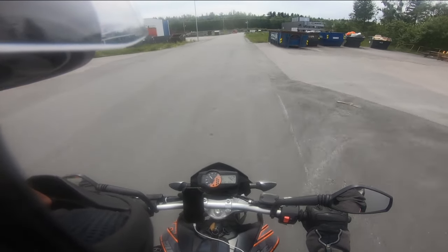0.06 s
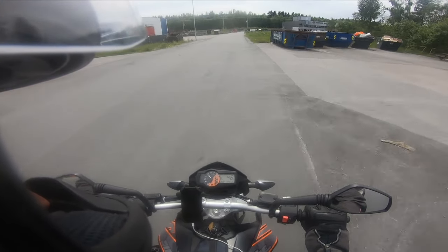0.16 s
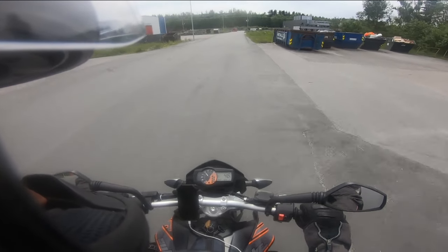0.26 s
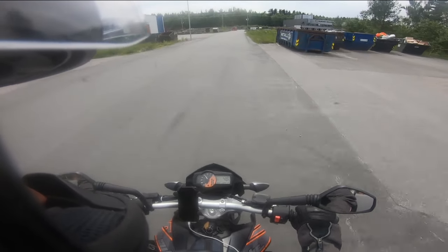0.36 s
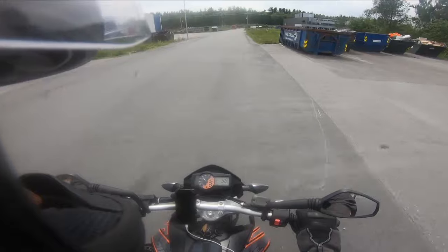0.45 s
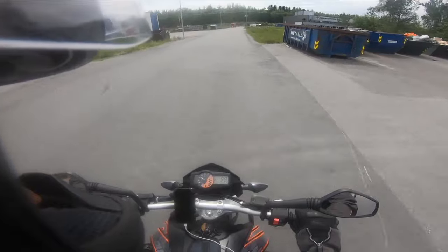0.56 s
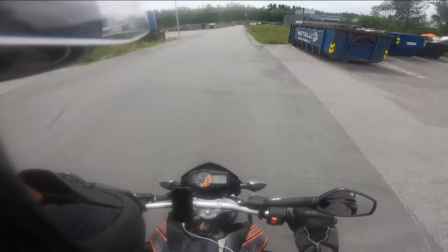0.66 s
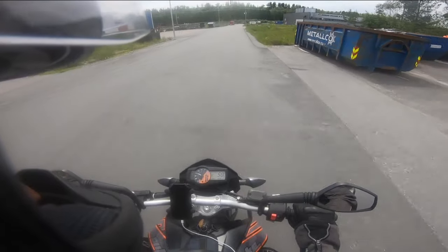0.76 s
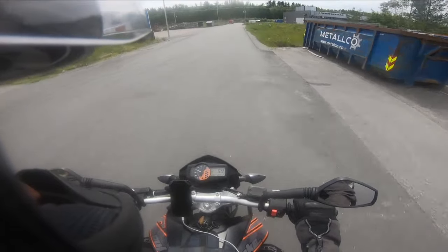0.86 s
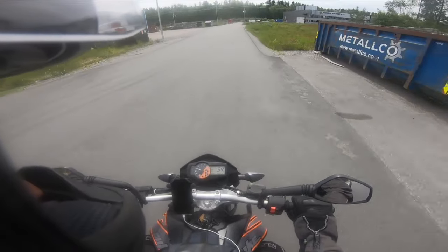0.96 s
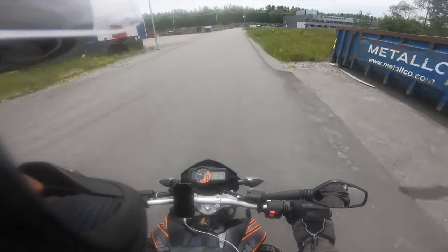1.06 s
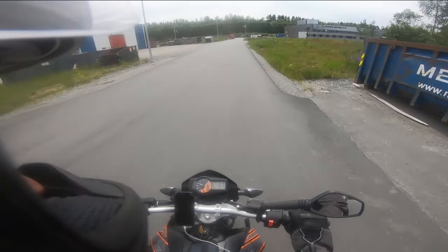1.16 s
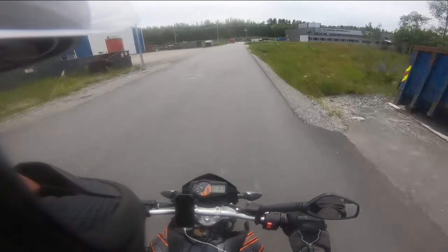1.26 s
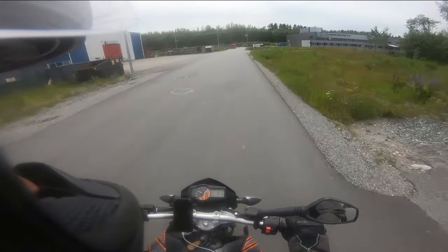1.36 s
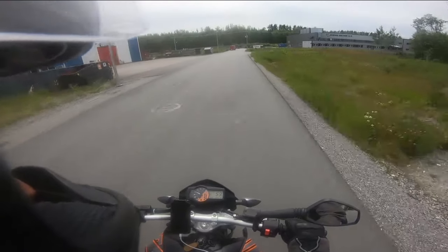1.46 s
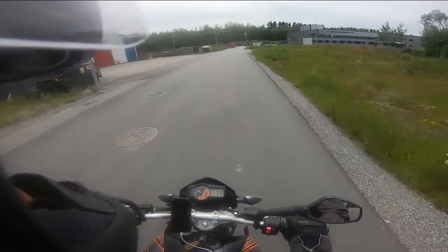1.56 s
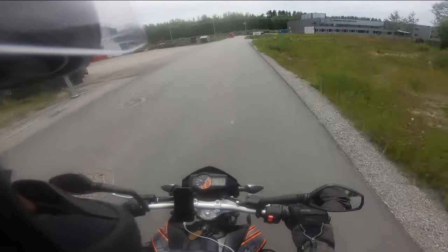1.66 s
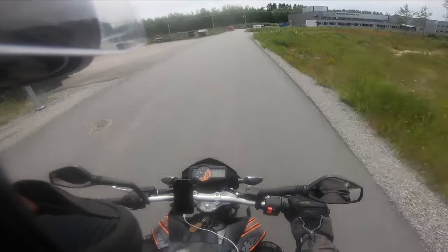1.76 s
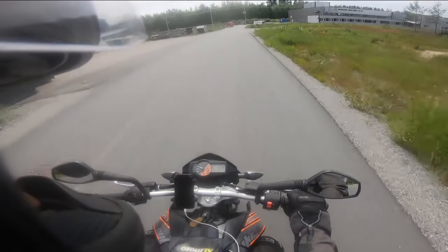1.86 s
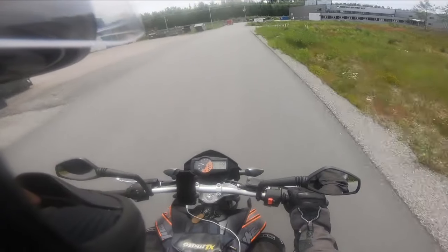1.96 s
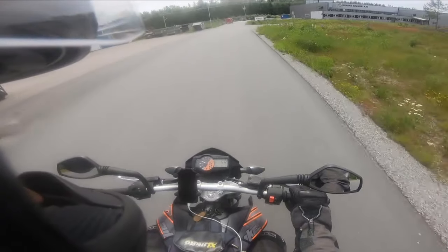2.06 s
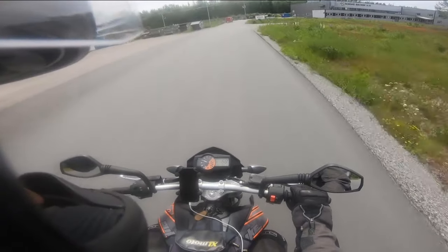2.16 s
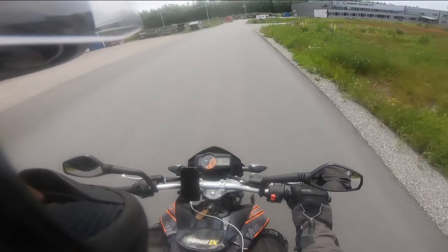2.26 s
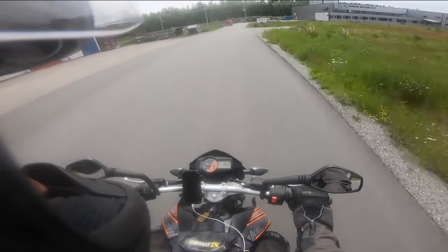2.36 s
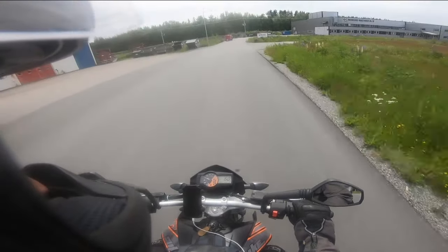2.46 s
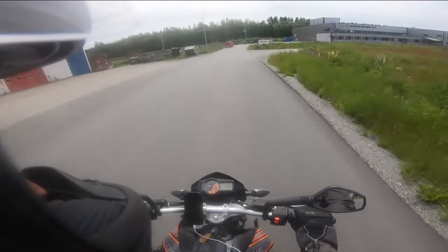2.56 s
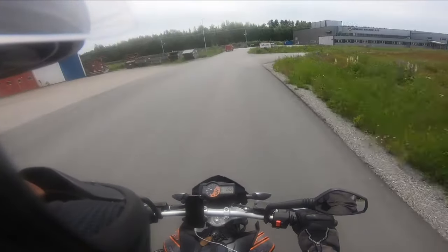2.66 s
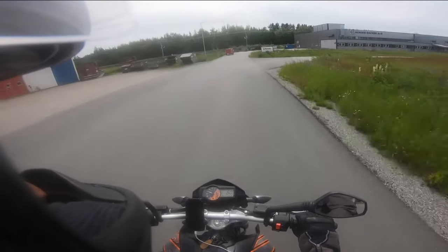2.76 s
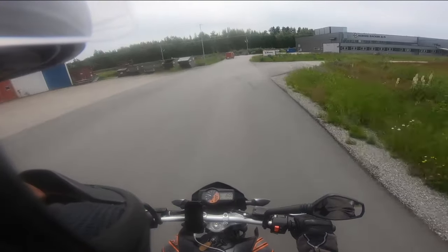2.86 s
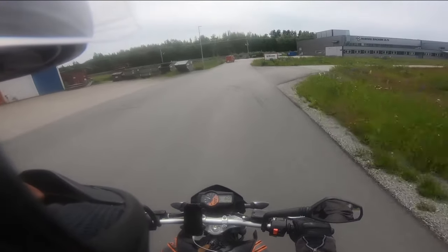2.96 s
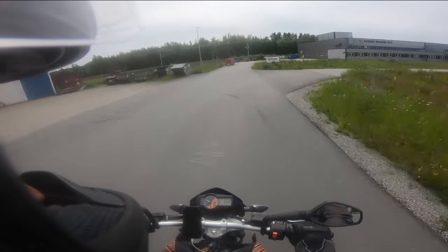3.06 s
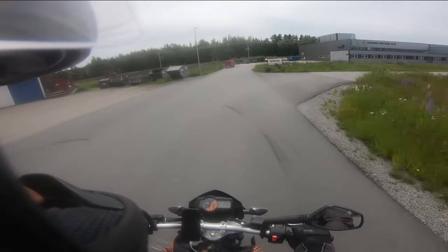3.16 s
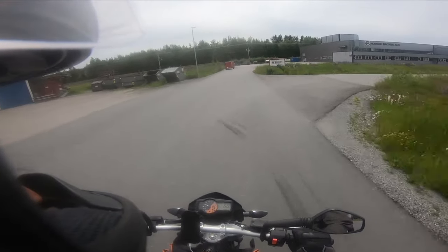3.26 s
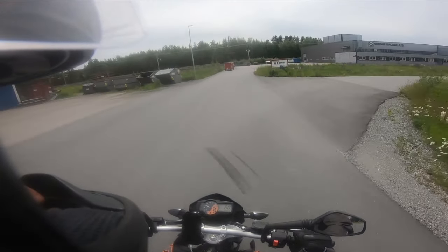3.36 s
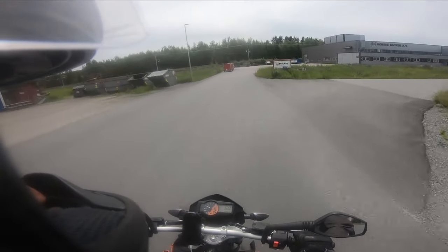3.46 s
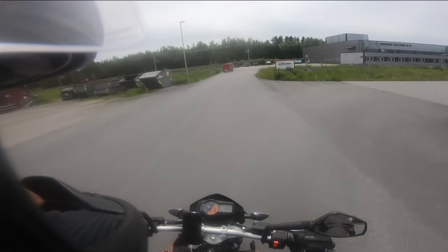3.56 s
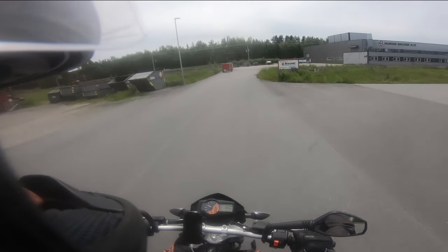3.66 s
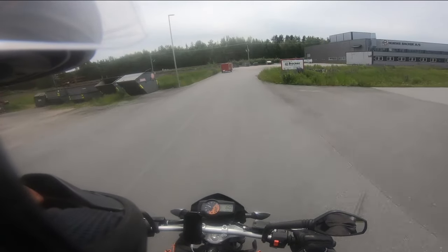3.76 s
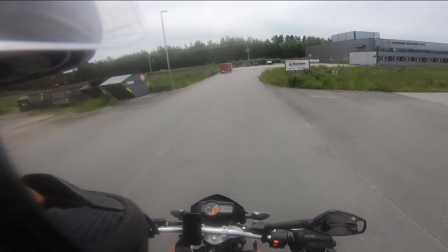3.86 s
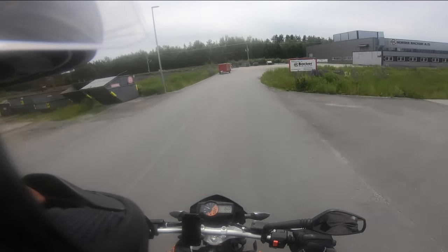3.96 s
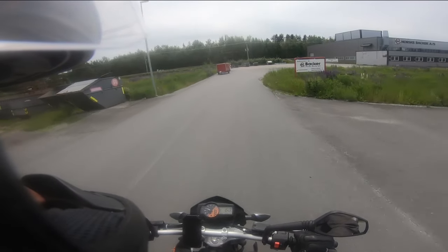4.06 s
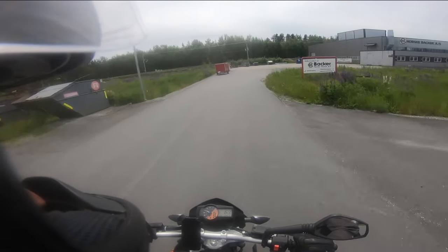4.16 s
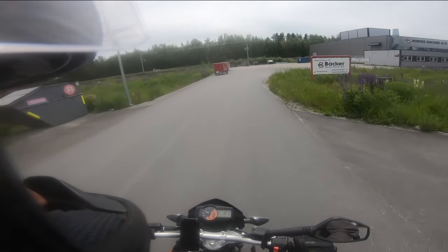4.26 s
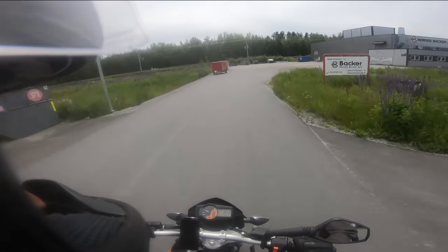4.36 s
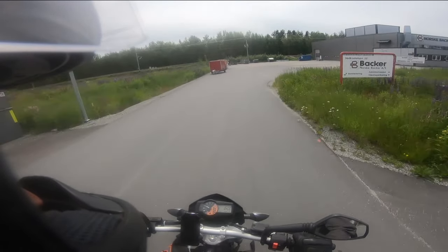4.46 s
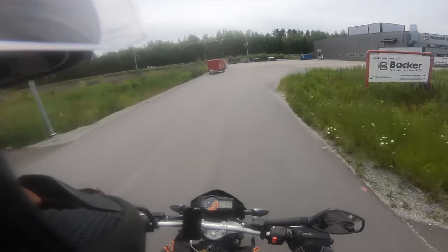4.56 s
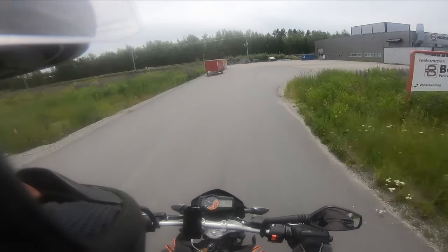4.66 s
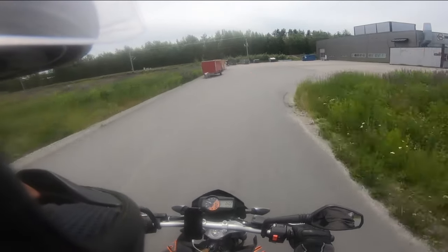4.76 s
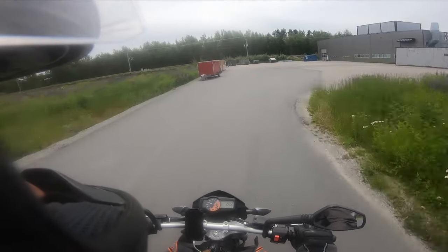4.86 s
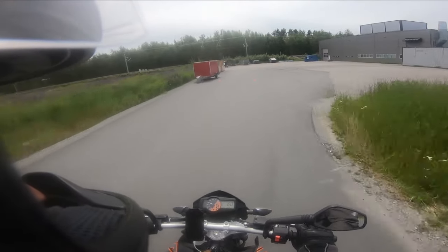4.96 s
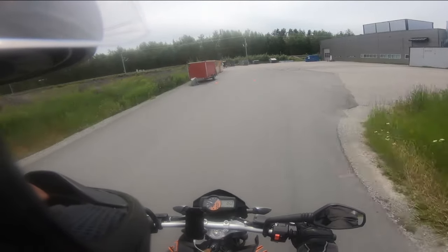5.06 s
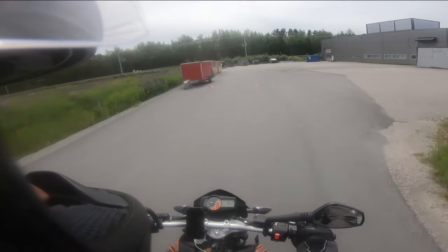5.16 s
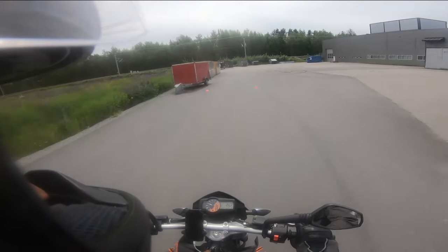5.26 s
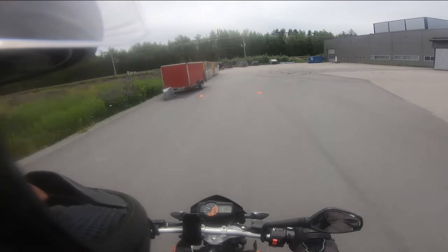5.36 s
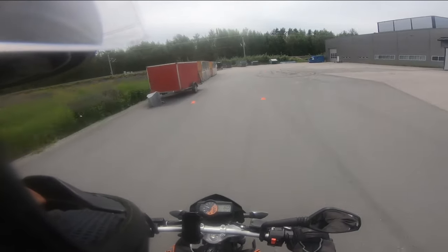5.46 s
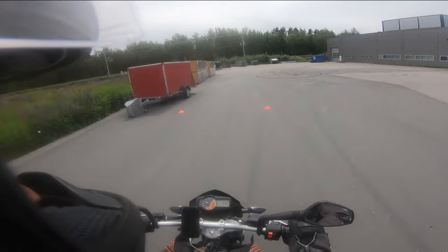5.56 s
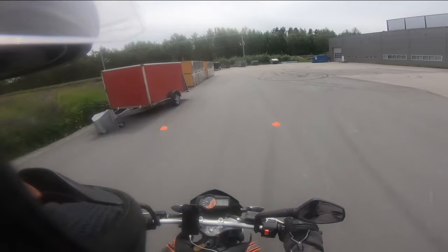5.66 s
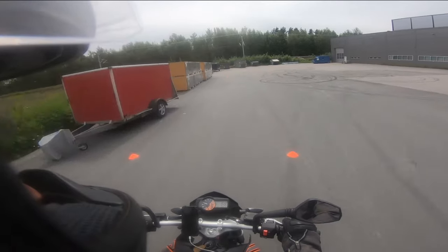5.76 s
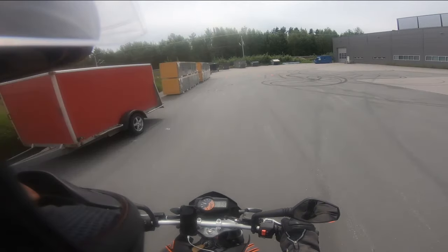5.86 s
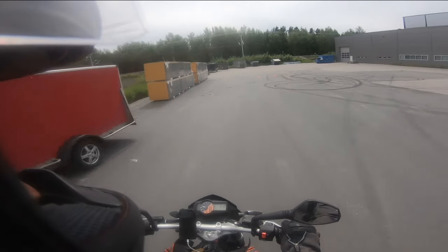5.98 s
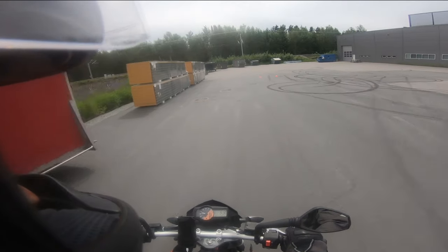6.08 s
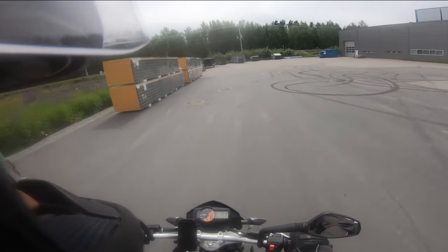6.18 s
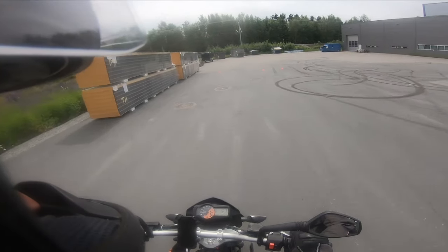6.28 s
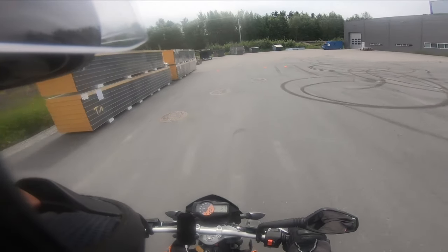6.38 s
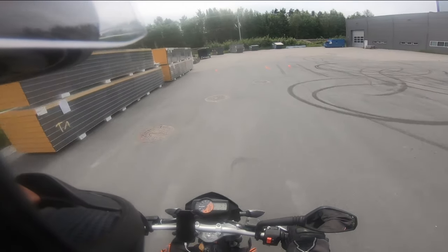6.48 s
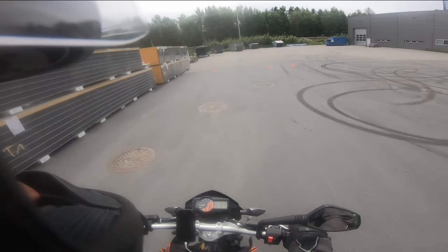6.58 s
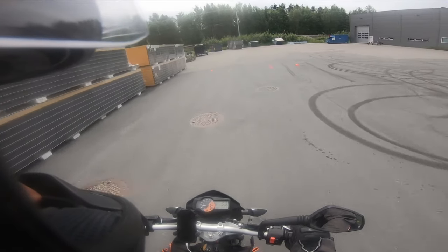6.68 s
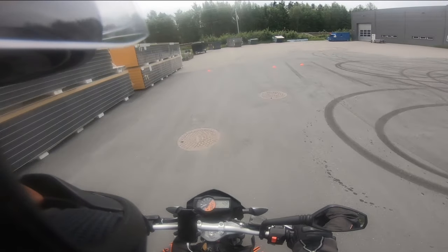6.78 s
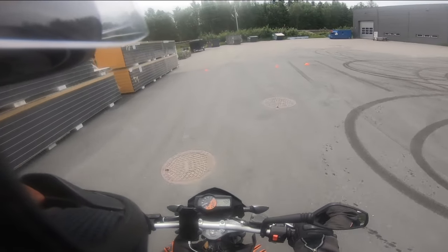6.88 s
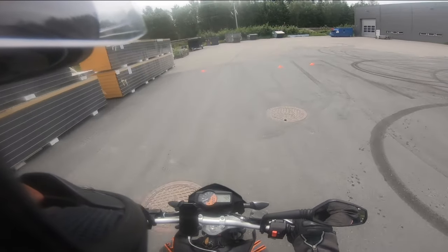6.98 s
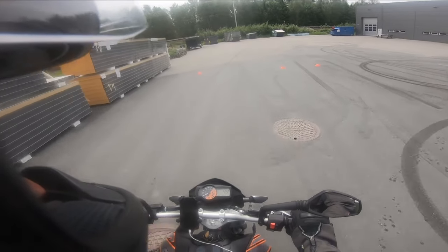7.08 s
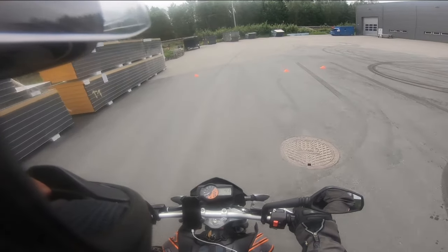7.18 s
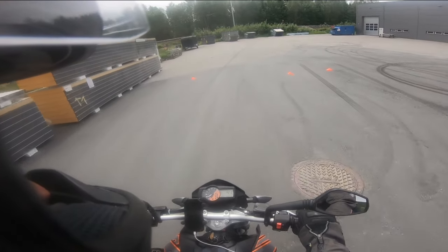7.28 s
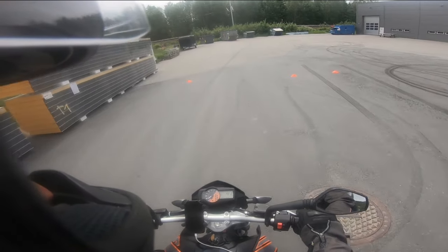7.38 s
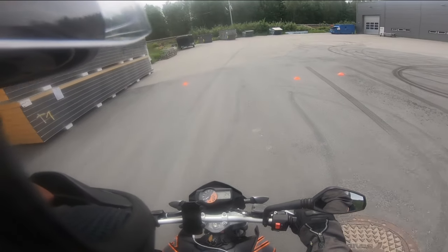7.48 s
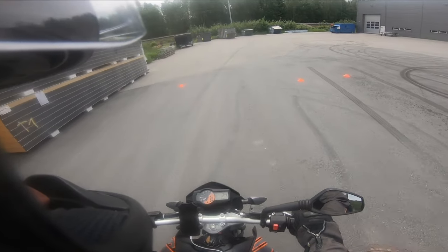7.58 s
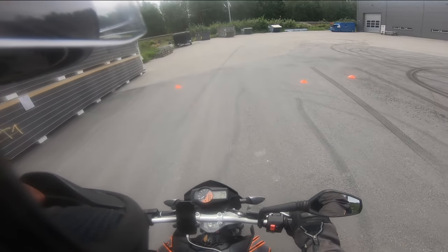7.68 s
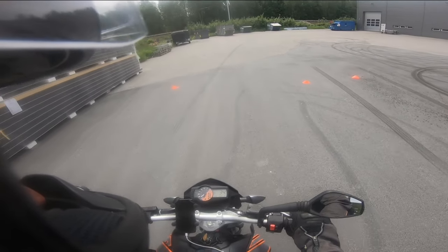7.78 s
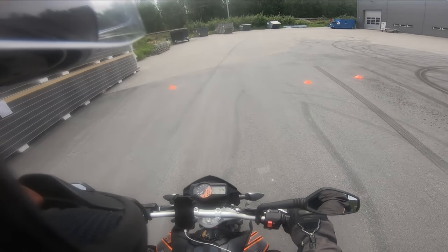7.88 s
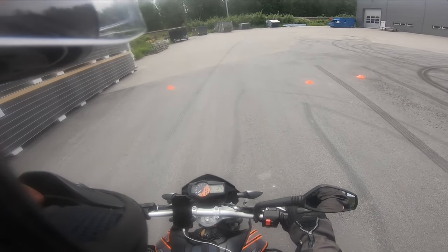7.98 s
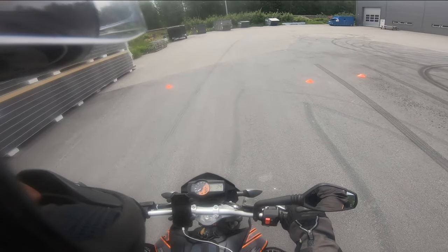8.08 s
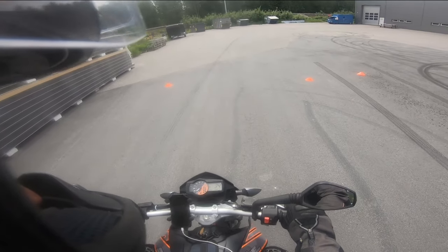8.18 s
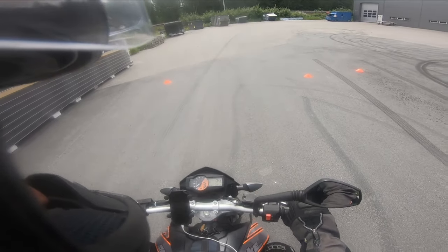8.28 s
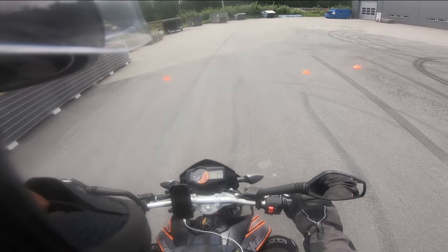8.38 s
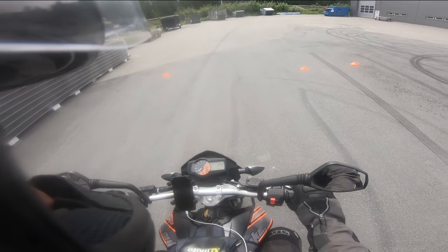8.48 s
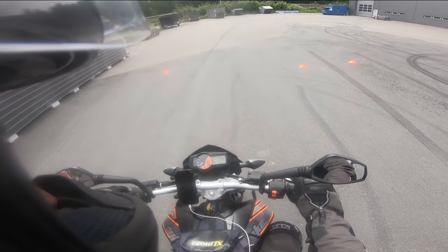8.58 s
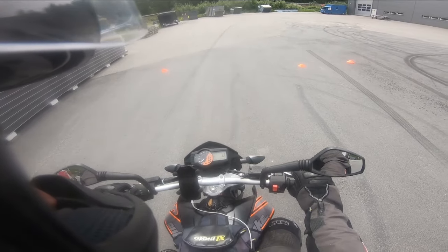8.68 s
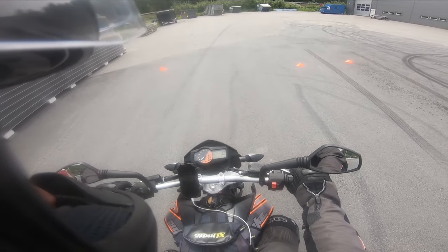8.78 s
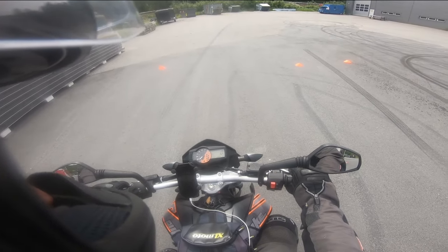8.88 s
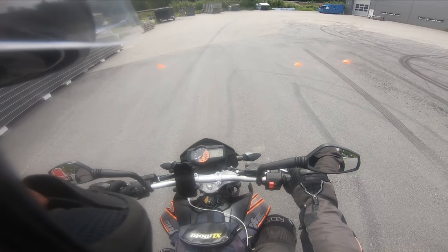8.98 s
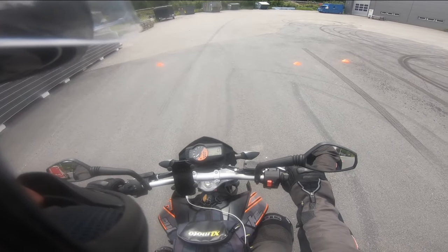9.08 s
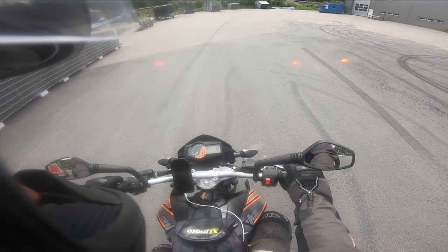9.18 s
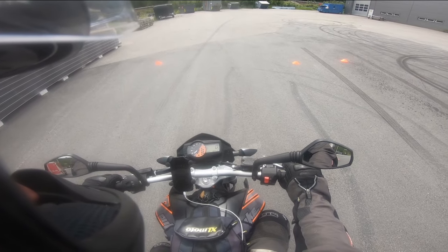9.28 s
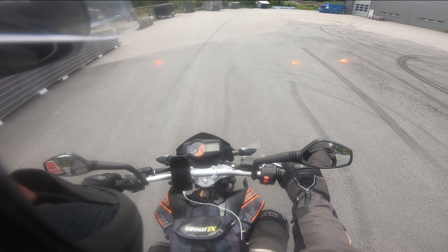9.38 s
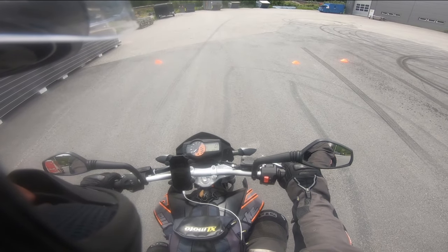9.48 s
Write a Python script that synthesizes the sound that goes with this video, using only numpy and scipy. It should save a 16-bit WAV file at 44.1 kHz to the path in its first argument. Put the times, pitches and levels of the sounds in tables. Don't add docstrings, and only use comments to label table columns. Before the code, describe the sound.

The microphone sits on the side of a rider's helmet in an open lot. From 0 to about 5.7 s, loud turbulent wind fills everything: deep buffeting, a broad low-mid roar and softer rush, with a rough hollow howl wandering roughly between 80 and 185 Hz, locking in by short spells. A brief change of gust comes near 1.8 s; brighter flutters pass around 4.2 to 5.8 s. From 6 s the wind sinks in uneven puffs, nearly gone by 8 s. At about 7.6 s a single-cylinder idle emerges, initially uneven and muffled, then steady at thirteen firings per second: low exhaust thump, hard woody-metallic knock, valve ticks and gear clatter, strongest after 8.2 s. A faint brake groan near 420 Hz sounds around 7.9 to 8.05 s. Small lever clicks scatter from 7.5 s, clustering sharply at 8.4 s. The idle continues to the end at 9.5 s.

```python
import sys
import numpy as np
from scipy import signal
from scipy.io import wavfile

SR = 44100
rng = np.random.default_rng(int(sys.argv[2]) if len(sys.argv) > 2 else 0)


def voltage_ratio(decibels):
    exponent = np.asarray(decibels, float) / 20
    return 10 ** exponent


def waveform_to_disk(signal):
    frames = np.transpose(np.atleast_2d(signal))
    scaled = np.clip(frames, -1, 1) * 32767
    samples = np.round(scaled).astype(np.int16)
    wavfile.write(sys.argv[1], SR, samples)


N = 420273

# start_s, airspeed_db (re cruising), exposure_db (of the microphone side)
AIR = [(0.0, 0, -3), (0.9, -0.5, -2.5), (1.3, -2, 0.5), (1.7, -5.5, 2), (1.85, 0.5, -3), (2.4, -1, -2),
       (2.75, 0, 0.5), (3.5, 1, 0), (4.4, -1.5, 1), (5.7, -2, 1.5), (5.95, -6, 2.5), (6.25, -7.5, 3.5),
       (6.45, -13.5, -0.5), (6.85, -22, 5.5), (7.0, -23, 7), (7.25, -32.5, 5), (7.8, -19, -13),
       (8.1, -45, -3), (9.53, -42.5, 3)]
WIND_BAND_HZ = [50, 370, 1300, 4200]
SPEED_SHARE = [0.249, 0.6, 0.9, 1.01]
EXPOSURE_SHARE = [0.17, 1.1, 1.24, 0.05]
# freq_hz, density_db (per Hz)
WIND_COLOUR = [(8.8, -46), (15, -31.5), (38, -5.5), (105, -3.5), (160, -5.5), (202, -6), (311, -6.5),
               (381, -10.5), (573, -11), (1200, -18.5), (1760, -24.5), (3000, -39.5), (3980, -38),
               (5500, -48.5), (6620, -49.5), (8610, -93.5), (14600, -120)]
# middle_s, length_s, strength_db, centre_hz
EDDIES = [(0.28, 0.11, 6.5, 76), (.5, .12, -2, 2500), (1.88, 0.16, -4, 43.3), (2.4, 0.082, 3, 43.6),
          (2.55, .3, 2.5, 50), (3.2, 0.09, 1, 2100), (3.7, 0.2, 0.5, 2200), (2.15, .12, -2, 2500),
          (4.24, 0.08, 3, 1800), (4.345, 0.075, -7, 1400), (4.727, 0.27, 2.5, 2370),
          (4.991, 0.12, 5.5, 2600), (4.948, 0.14, -2, 51), (5.377, 0.19, 2.5, 2300),
          (5.807, 0.12, 5.5, 2420), (6.163, 0.21, -4, 40), (6.349, 0.021, -9, 504), (6.523, 0.44, 3, 50),
          (6.701, 0.12, -7.5, 320), (6.933, .2, 3.5, 683), (7.267, .08, -8.5, 330), (7.4, 0.15, 4, 140),
          (7.713, 0.21, 11, 324), (7.871, 0.04, 14, 160), (1.4, 0.28, 1, 390), (4.87, 0.069, -4.5, 1800),
          (8.8, 0.5, 10.5, 450), (8.3, .5, -4, 200), (6.0, .2, -3, 1600), (8.3, 0.34, -6, 70),
          (4.8, .25, -5, 120), (8.45, .35, 8, 360), (4.75, 0.18, -2, 210), (6.1, 0.97, -8, 29),
          (5.9, .4, 3, 28), (1.2, 2.7, 2, 16000), (6.45, .2, 5.5, 151), (5.2, .15, -1, 3500),
          (6.448, 0.026, 3, 850), (7.345, 0.038, 2, 900), (7.4, .1, -3.5, 2500), (5.72, 0.31, -3.5, 620),
          (3.25, 0.2, 1, 170), (7.4, 0.4, 3, 100), (8.4, 0.27, -2, 190), (2.87, .14, 4, 1700),
          (2.85, .1, -3, 260), (5.55, .3, -2.5, 140), (4.55, .1, -3, 300), (4.05, .12, -2, 1800)]
# time_s, pitch_hz
SHEDDING = [(0.0, 123.7), (0.13, 111.8), (0.22, 139.6), (0.33, 176), (0.39, 180), (0.5, 131.7), (0.56, 117),
            (0.68, 135.5), (0.75, 110.2), (0.84, 123.6), (1.0, 106.2), (1.15, 113.2), (1.37, 125.8),
            (1.58, 113.3), (1.68, 122), (1.76, 151), (1.82, 152), (1.87, 180), (1.92, 178), (2.03, 146),
            (2.1, 116), (2.17, 131), (2.24, 132), (2.29, 146), (2.36, 122.2), (2.47, 106.4), (2.8, 92),
            (3.0, 125), (3.22, 148), (3.55, 134.7), (3.8, 128), (3.95, 175), (4.05, 185), (4.2, 110),
            (4.45, 92), (4.7, 78), (4.86, 97), (5.2, 112), (5.6, 96.8), (7.2, 64.6)]
# middle_s, length_s, lift_db
LOCKS = [(0.02, 0.25, 16), (0.368, 0.12, 8), (.45, .1, 8), (.85, .08, 10), (1.86, .1, 9), (2.26, .1, 13.5),
         (0, .03, 20), (2.57, .1, 9), (4.1, .1, 5), (4.86, .12, 13), (0.61, 0.34, 15), (0.775, 0.17, 16),
         (1.14, 0.095, 12.5), (1.351, 0.11, 10.5), (1.68, .1, 9.5), (1.78, 0.12, 11), (1.92, .12, 6.5),
         (2.15, 0.3, 15.5), (2.37, 0.18, 14.5), (2.803, .2, 10.5), (3.1, .2, 7), (3.24, 0.083, 8.5),
         (3.55, 0.13, 11), (3.72, 0.17, 12), (4.22, 0.28, 13), (4.45, 0.13, 9), (4.76, 0.25, 11),
         (5.247, 0.3, 10.5), (5.549, 0.23, 10.5), (6.16, 0.086, 4), (6.39, .1, 8), (6.664, 0.21, 15)]
# time_s, pitch_hz, level_db
BRAKE_GROAN = [
    (7.86, 420, -60),
    (7.91, 421, -45),
    (8.02, 417, -42),
    (8.08, 413, -72),
]
# start_s, peak_db
LEVER_CLICKS = [(7.479, -50), (7.5017, -42), (7.5045, -42), (7.514, -46), (7.5945, -42), (7.599, -41),
                (7.637, -46), (7.65, -46), (7.719, -45), (7.914, -37), (8.104, -44), (8.2436, -35),
                (8.248, -36), (8.293, -41), (8.336, -38), (8.352, -38), (8.379, -31), (8.3815, -30),
                (8.385, -33), (8.389, -24), (8.394, -36), (8.398, -23), (8.4074, -37), (8.412, -36),
                (8.417, -34), (8.452, -36), (8.484, -44), (8.624, -43), (8.68, -41), (8.9315, -41),
                (8.98, -42), (9.139, -43), (9.2098, -39), (9.232, -41), (9.343, -42)]
# freq_hz, level_db, t60_s
LEVER_MODES = [(2630, 1, 0.0091), (3050, 1.5, 0.0078), (3480, -1, 0.012), (4100, -7, 0.0055),
               (4900, -12, .005), (5800, -16, 0.0041), (6800, -8, .004), (8500, -9, .003)]
# start_s, peak_db
GRIT = [
    (6.5913, -50),
    (6.776, -50),
    (7.0162, -56),
    (7.2348, -53),
    (7.2676, -57),
    (7.4048, -57),
]
# freq_hz, level_db, t60_s
TAPPET_MODES = [(3600, 1.5, .006), (4500, -1, .004), (5700, -4, .005), (6800, -6, .004), (8200, -0.5, .003)]
# time_s, peak_db
TAPPET_PEAK = [
    (7.57, -59),
    (8.1, -56),
    (8.35, -48),
    (8.9, -52),
    (9.5, -48),
]
# time_s, level_db
CLATTER_LEVEL = [(7.3, -58), (7.41, -63), (7.7, -54), (7.85, -52.5), (8.11, -46.5), (8.29, -41.5),
                 (8.7, -46), (8.91, -47), (9.53, -44.5)]
# freq_hz, width_hz, level_db
CASING = [(276, 89, 6), (627.2, 53, 13.5), (454, 96, 8.5), (810, 150, 9), (1170, 290, 5), (1660, 240, 2),
          (2850, 500, -34), (3400, 270, -4.5), (4250, 460, -10), (4750, 400, -11), (5750, 400, -12.5),
          (6640, 500, -21), (8500, 830, -10)]
# start_s, knock_peak_db, thump_peak_db
FIRINGS = [(7.571, -18, -15), (7.646, -31, -26), (7.721, -25, -19.5), (7.796, -37, -25), (7.873, -35, -25),
           (7.949, -31, -17.5), (8.024, -32, -19), (8.103, -24, -18), (8.179, -16.5, -18.5),
           (8.254, -12, -14.5), (8.328, -17, -11.5), (8.403, -21, -10), (8.48, -19, -8.5),
           (8.558, -20, -9.5), (8.635, -18, -9.5), (8.715, -22, -10), (8.787, -20, -11.5),
           (8.864, -19, -18.5), (8.94, -17.5, -15.5), (9.018, -22, -14.5), (9.094, -17, -14),
           (9.167, -18, -16.5), (9.241, -17.5, -20), (9.319, -15.5, -11.5), (9.398, -21, -16),
           (9.476, -19, -11)]
# freq_hz, level_db, t60_s
PIPE_MODES = [(112.6, 3.4, .128), (51.8, .3, .3), (71.9, 1.0, .1)]
# freq_hz, level_db, t60_s
SILENCER_MODES = [(266, -22, 0.04), (316, -23, 0.04), (380, -21, 0.03), (470, -25, .03)]
# freq_hz, level_db, t60_s
HEAD_MODES = [(651, 6.5, 0.013), (672, 1, 0.017), (1063, -10.5, 0.035), (780, -5, 0.026),
              (490, -16.5, 0.021)]
# freq_hz, level_db, t60_s
VALVE_MODES = [(1560, 7, 0.014), (1634, 6.5, 0.024), (1810, 1, 0.018), (1180, -2, .02), (2230, -7, 0.013),
               (3360, -7, .015), (3680, -15, .015)]
# time_s, peak_db
VALVE_PEAK = [
    (7.57, -47),
    (8.1, -33),
    (8.45, -36.5),
    (8.9, -39),
    (9.3, -34.5),
]
# time_s, level_db
STRAY_STEPS = [
    (6.437, -60),
    (6.8, -62),
    (7.157, -57),
    (7.352, -57),
]


def rms_one(x):
    return x / np.sqrt(np.mean(x ** 2) + 1e-20)


def in_time(rows):
    s, *columns = np.transpose(rows)
    return [np.interp(np.arange(N) / SR, s, c) for c in columns]


def bump(middle_s, length_s):
    return np.exp(-4 * ((np.arange(0, N, 50) / SR - middle_s) / length_s) ** 2)


def per_sample(coarse):
    return np.interp(np.arange(N), np.arange(0, N, 50), coarse)


def drift(rate_hz):
    r = np.exp(-40 * np.pi * rate_hz / SR)
    white = rng.standard_normal(N // 20 + 3002)
    slow = signal.lfilter([1], [1, -2 * r, r * r], white)[3000:]
    return np.interp(np.arange(N) / 20, np.arange(len(slow)), rms_one(slow))


def butter(x, hz, kind, order=2):
    return signal.sosfilt(signal.butter(order, hz, kind, fs=SR, output="sos"), x)


def resonate(x, hz, width_hz):
    r = np.exp(-np.pi * width_hz / SR)
    zeros = np.array([1, 0, -1]) * (1 - r * r) / 2
    return signal.lfilter(zeros, [1, -2 * r * np.cos(2 * np.pi * hz / SR), r * r], x)


def clicks_at(seconds, sizes):
    train = np.full(N, 1e-18)
    at = np.round(np.asarray(seconds) * SR).astype(int)
    train[at[at < N]] = sizes[at < N]
    return train


def strike(seconds, peak_db, modes, spread_db):
    out = 0
    chance = rng.standard_normal((len(seconds), len(modes)))
    for k, (hz, level_db, t60_s) in enumerate(modes):
        r, w = voltage_ratio(-60 / (t60_s * SR)), 2 * np.pi * hz / SR
        sizes = (-1) ** k * voltage_ratio(peak_db + level_db + spread_db * chance[:, k])
        train = clicks_at(seconds, sizes)
        out = out + signal.lfilter([0, np.sin(w)], [1, -2 * r * np.cos(w), r * r], train)
    return out


def wind(gust_db, eddy_db, own_db):
    level_db, eddy_octaves = -13, 1.38
    speed_db, exposure_db = in_time(AIR)
    swells = np.array([db * bump(s, length_s) for s, length_s, db, hz in EDDIES])
    eddy_hz = np.array(EDDIES)[:, 3]
    colour_hz, colour_db = np.transpose(WIND_COLOUR)
    white = rng.standard_normal((2, N + SR))
    edges_hz = 15 * 2 ** (np.arange(29) / 3)
    shared = gust_db * drift(6.0) + eddy_db * drift(89.0)
    out, power = 0, 0
    for k, (low, high) in enumerate(zip(edges_hz, edges_hz[1:])):
        hz = np.sqrt(low * high)
        follows = np.interp(np.log(hz), np.log(WIND_BAND_HZ), SPEED_SHARE)
        exposed = np.interp(np.log(hz), np.log(WIND_BAND_HZ), EXPOSURE_SHARE)
        near = np.exp(-(np.log2(hz / eddy_hz) / eddy_octaves) ** 2)
        change_db = follows * speed_db + exposed * exposure_db + per_sample(near @ swells)
        density = voltage_ratio(np.interp(np.log(hz), np.log(colour_hz), colour_db))
        band = density * butter(white[k % 2], [low, high], "band")[SR:]
        if 2000 < hz < 3000:
            band = np.sqrt(2) * butter(band, hz, "low", order=4)
        power += np.mean(band ** 2)
        reach = np.clip(np.log2(hz / 97.0) / 10.0, 0, 1)
        out = out + band * voltage_ratio(change_db + reach * shared + own_db * drift(16.0))
    return voltage_ratio(level_db) * out / np.sqrt(power)


def howl(wobble_hz, flutter_db):
    tone_db, skirt_db, skirt_hz = -26, -23.5, 22.1
    start_rad = -1.9
    hz, = in_time(SHEDDING)
    speed_db = 0.3 * in_time(AIR)[0]
    locked_db = np.max([db * bump(s, length_s) for s, length_s, db in LOCKS], axis=0)
    level_db = tone_db + speed_db + per_sample(locked_db)
    t = np.arange(N) / SR
    fade = np.interp(t, [7.2, 7.6], [1, 0])
    loose = np.interp(t, [2.5, 4.5], [.7, 2.5])
    turn = 2 * np.pi * np.cumsum(hz + loose * wobble_hz * drift(15.84)) / SR
    rough = rms_one(voltage_ratio(flutter_db * drift(11.0)) * np.sin(start_rad + turn))
    tone = voltage_ratio(level_db - 3.0) / np.sqrt(loose) * rough
    skirt = drift(skirt_hz) * np.sin(turn) + drift(skirt_hz) * np.cos(turn)
    return fade * (tone + voltage_ratio(skirt_db + speed_db) * skirt)


def brake():
    hz, level_db = in_time(BRAKE_GROAN)
    t = np.arange(N) / SR
    on = (t > BRAKE_GROAN[0][0]) & (t < BRAKE_GROAN[-1][0])
    strength = voltage_ratio(level_db + 0.9 + 1.5 * drift(18.0))
    return on * strength * np.sin(2 * np.pi * np.cumsum(hz + 4.0 * drift(15.0)) / SR)


def lever():
    s, peak_db = np.transpose(LEVER_CLICKS)
    r = voltage_ratio(-60 / (0.047 * SR))
    train = clicks_at(s - .003, voltage_ratio(peak_db - 26.0))
    swell = signal.lfilter([np.e * (1 - r)], [1, -2 * r, r * r], train)
    white = rng.standard_normal(N)
    scratch = rms_one(resonate(white, 3000.0, 800.0) + 0.07 * butter(white, [4000.0, 9000.0], "band"))
    return strike(s, peak_db - 6.5, LEVER_MODES, spread_db=2.0) + swell * scratch


def tappets():
    lead_s = .011
    s = np.array(FIRINGS)[:, 0] - lead_s
    peak_db = np.interp(s, *np.transpose(TAPPET_PEAK))
    grit_s, grit_db = np.transpose(GRIT)
    ticks = strike(s, peak_db, TAPPET_MODES, spread_db=2.0)
    return ticks + strike(grit_s, grit_db, TAPPET_MODES, spread_db=5.0)


def clatter(ticks_per_s, grain, beat_db):
    hush_lead_s, hush_s, hush_db = .008, .016, 4
    level_db, = in_time(CLATTER_LEVEL)
    s = np.array(FIRINGS)[:, 0]
    beat = signal.lfilter([1], [1, -voltage_ratio(-60 / (.09 * SR))], clicks_at(s - .004, np.ones(len(s))))
    hush = per_sample(sum(bump(at - hush_lead_s, hush_s) for at in s))
    sizes = voltage_ratio(grain * np.minimum(rng.exponential(1, (3, N)), 3)) * rng.choice([-1, 1], (3, N))
    ticks = sizes * (rng.random((3, N)) < ticks_per_s / SR)
    body = 0
    for k, (hz, width_hz, db) in enumerate(CASING):
        body = body + voltage_ratio(db) * rms_one(resonate(ticks[k % 3], hz, width_hz))
    t = np.arange(N) / SR
    fade = np.interp(t, [6.6, 7.5], [0, 1])
    shaded = butter(body, 5500.0, "low", order=4)
    opened = np.interp(t, [7.8, 8.5], [0.6, 0.85])
    strength = voltage_ratio(level_db - 11.5 + beat_db * beat - hush_db * hush)
    return fade * strength * (shaded + opened * (body - shaded))


def exhaust():
    pipe_lag_s, pipe_low_hz, pipe_high_hz = .018, 80, 118
    s, knock_db, thump_db = np.transpose(FIRINGS)
    rings = strike(s + pipe_lag_s, thump_db, PIPE_MODES, spread_db=-1.0)
    shell = strike(s + 0.004, thump_db - 3.0, SILENCER_MODES, spread_db=3.0)
    shell = shell + strike(s + 0.040, thump_db, SILENCER_MODES, spread_db=3.0)
    thump = butter(butter(rings, pipe_high_hz, "low", order=4), pipe_low_hz, "high")
    return thump + butter(shell, 450.0, "low")


def knock():
    blows = [(-.0016, -15), (0, -8), (.0016, -10), (.007, -14), (.012, -21),
             (.022, -20), (.027, -14), (.045, -16), (.051, -21)]
    seatings = [(-.003, -15), (.001, -7.5), (.004, -7.5), (.008, -8),
                (.024, -15), (.036, -10), (.040, -12), (.050, -13)]
    s, knock_db, thump_db = np.transpose(FIRINGS)
    valve_db = np.interp(s, *np.transpose(VALVE_PEAK))
    knock_db = knock_db + np.interp(s, [7.88, 7.94], [-9, 0])
    head, seats = 0, 0
    for lag_s, blow_db in blows:
        head = head + strike(s + lag_s, knock_db + blow_db, HEAD_MODES, spread_db=1.5)
    for lag_s, seat_db in seatings:
        seats = seats + strike(s + lag_s, valve_db + seat_db, VALVE_MODES, spread_db=2.5)
    return butter(head, 1500.0, "low") + butter(seats, [1100.0, 4500.0], "band")


def scene():
    air = wind(gust_db=0.35, eddy_db=3.0, own_db=0.9)
    air = air + howl(wobble_hz=4.0, flutter_db=2.0)
    gear = clatter(ticks_per_s=1600.0, grain=2.3, beat_db=3.5)
    engine = exhaust() + knock() + gear + lever() + brake() + tappets()
    return (air + engine)[None]


def gain_steps():
    block_s, start_s = 256 / 48000, .0047
    lag_s, spell_s, step_db = .033, .026, -42
    blocks = np.arange(start_s, N / SR, block_s)
    s, knock_db, thump_db = np.transpose(FIRINGS)
    spells = np.exp(-4 * ((blocks - s[:, None] - lag_s) / spell_s) ** 2)
    pull = voltage_ratio(thump_db + step_db) @ spells
    stray_s, stray_db = np.transpose(STRAY_STEPS)
    pull[np.searchsorted(blocks, stray_s)] += voltage_ratio(stray_db)
    sizes = pull * voltage_ratio(5.0 * rng.standard_normal(len(blocks))) * rng.choice([-1, 1], len(blocks))
    return butter(clicks_at(blocks, sizes + 1e-18), 6500.0, "high")


def band_limit(x):
    return signal.sosfilt(signal.butter(12, 12700, fs=SR, output="sos"), x)


def record(dry):
    run_in = np.pad(dry, ((0, 0), (400, 0)), "reflect")
    coloured = run_in + 0.3 * resonate(run_in, 3880.0, 690.0) + 0.11 * resonate(run_in, 11000.0, 840.0)
    muffled = butter(coloured, 6030.0, "low", order=6)[:, 400:]
    muffled = muffled + gain_steps()
    mix = .95 * np.tanh(muffled / .95)
    return band_limit(mix)


dry = scene()
out = record(dry)
waveform_to_disk(out)
```